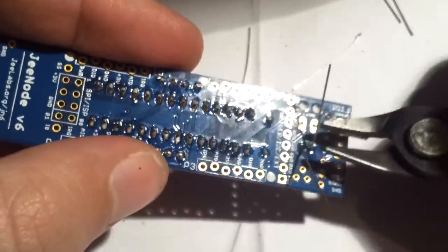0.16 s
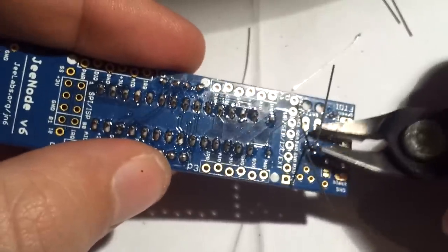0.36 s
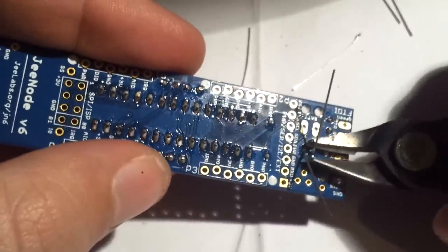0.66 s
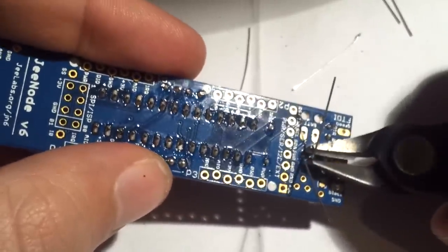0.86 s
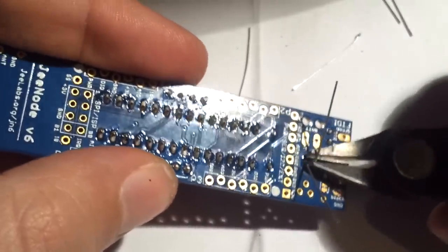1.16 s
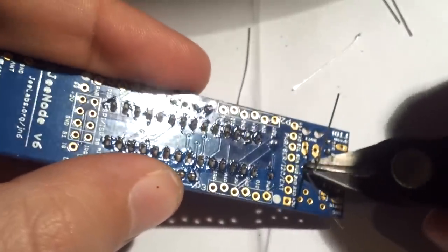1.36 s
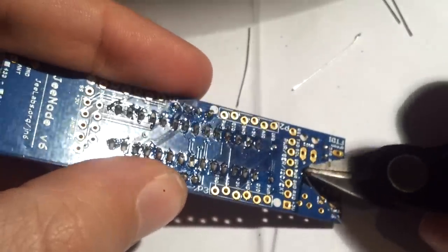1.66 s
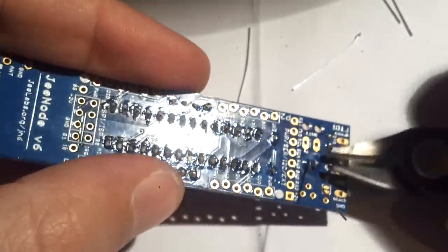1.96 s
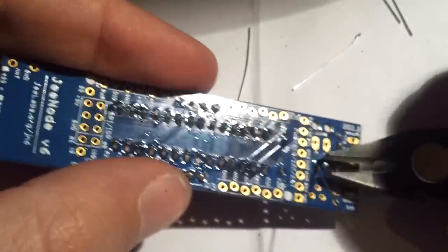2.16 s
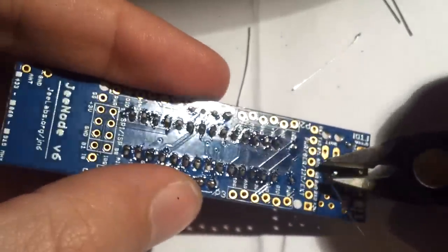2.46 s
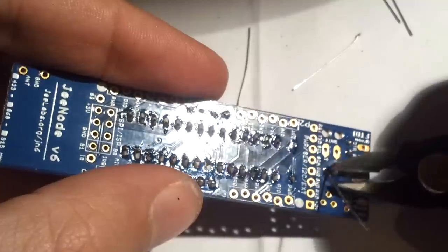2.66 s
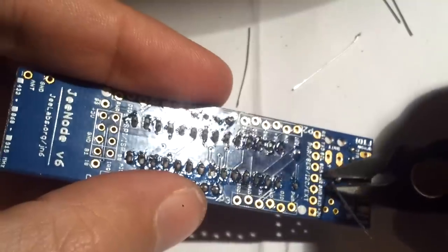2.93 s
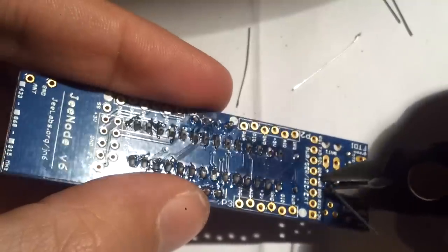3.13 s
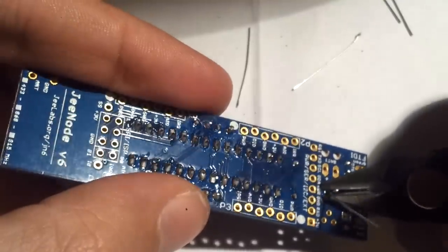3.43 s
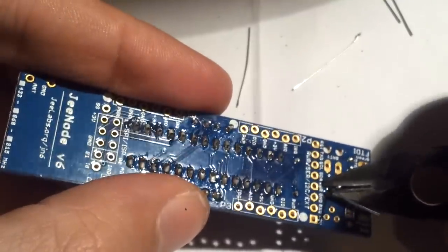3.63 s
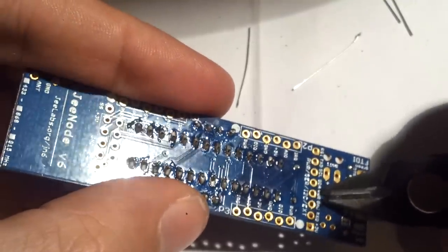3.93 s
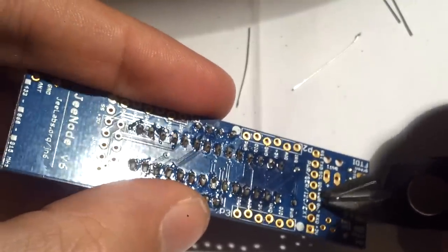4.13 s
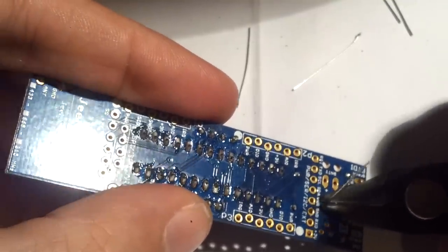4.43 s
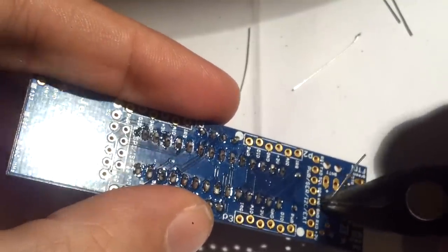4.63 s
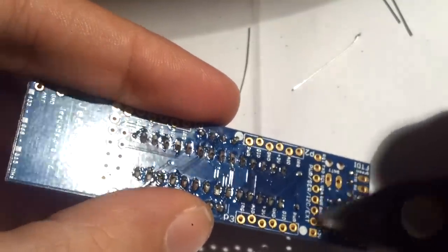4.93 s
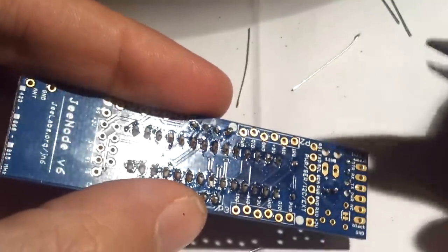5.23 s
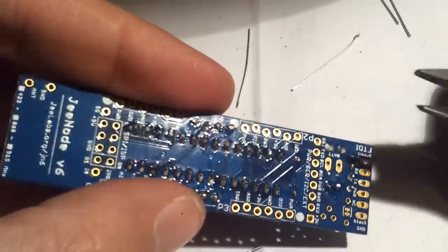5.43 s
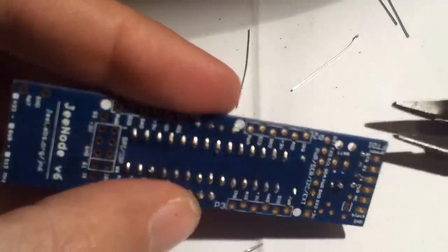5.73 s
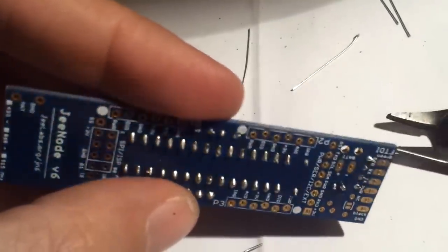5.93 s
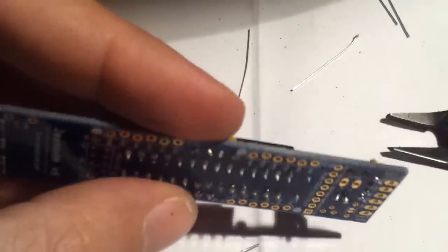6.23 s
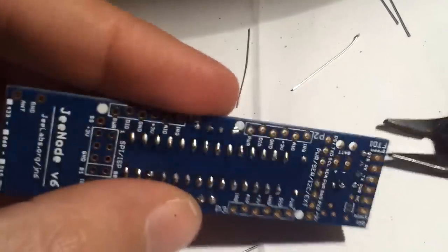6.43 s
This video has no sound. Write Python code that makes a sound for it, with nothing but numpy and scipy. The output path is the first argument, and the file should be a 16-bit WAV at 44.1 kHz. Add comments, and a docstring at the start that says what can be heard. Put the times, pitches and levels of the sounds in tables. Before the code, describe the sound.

Wire cutters snip two leads on a circuit board with sharp, ringing cracks and light ticks, over a steady fan hum.

```python
"""A fan hums throughout a small workshop; a mono microphone is close to a hand-held circuit board.
After a faint tick, wire cutters snip a lead with a crack, steel ring and echo; a wire offcut pings down.
Light ticks of jaws, leads and board follow; a second snip sounds, then more ticks.
Near the end the fingers turn the board with a swelling rub and soft knocks.
Noise bursts make cracks and scrapes, decaying sines ring steel and board, filtered noise and tones hum."""
import sys
import numpy as np
from scipy import signal
from scipy.fft import rfft, irfft, next_fast_len
from scipy.io import wavfile
from scipy.ndimage import uniform_filter1d, minimum_filter1d, map_coordinates

SR = 44100
rng = np.random.default_rng(int(sys.argv[2]) if len(sys.argv) > 2 else 0)


def master_out(mix):
    """Clip the mix to full scale and print it as 16-bit PCM to the path in sys.argv[1]."""
    frames = np.transpose(np.atleast_2d(mix))
    ceiling = np.clip(frames, -1, 1)
    pcm = np.round(ceiling * 32767).astype(np.int16)
    wavfile.write(sys.argv[1], SR, pcm)


N = 290619  # length in samples

# Leads parting near the microphone. Each row: start in seconds, relative level in dB,
# treble tilt in dB per octave, ring time of the jaws in seconds, room level in dB, time between jerks in seconds.
SNIP_EVENTS = [(1.5841, -2, 2, 0.0077, -26, 0.0011), (4.7899, 1, -1, 0.02, -20, .00095)]
# A lead tears in a few jerks, each this much weaker than the one before.
JERK_COUNT, JERK_LOSS_DB = 4, 1.5
# Recoil of the board: level relative to the snip, and a fade on top of the board's own damping.
RECOIL_DB, RECOIL_T60_S = -18.5, .02
# Fracture of the wire. Each row: frequency in Hz, relative level in dB per Hz.
CRACK_SPECTRUM = [(200, -16), (1200, -10.5), (2000, -18), (2900, -9.5), (3900, -11), (5300, -3),
                  (7600, 0.5), (9000, -6), (10200, -5), (11700, -11), (13000, -36)]
# Ringing peaks of the snip; their balance differs between the first and second snip. Each row:
# frequency in Hz, relative level in dB in the first snip, the same in the second, t60 as a share of the ring time.
RING_PEAKS = [(2860, -15, -18, 1.3), (3680, -30, -10.5, 1.3), (4000, -30, -12, 0.88),
              (4865, -5.5, -6.5, 1.2), (5640, -2, -5, .9), (6600, -3, -5, .8), (6900, 3, -5, 1.2),
              (7450, 5.5, 3, 0.63), (8250, 1.5, -2, 1.1), (9160, -12, -6, 0.81), (9500, -7, -12, .9),
              (9800, -1.5, -6, 1.7), (10350, -3, -9, 1.2), (11220, -17, -7, .9)]
# Lingering resonances of the tool. Each row: frequency in Hz, level in dB relative to the room
# in the first snip, the same in the second, t60 in seconds.
TOOL_MODES = [(5070, -18, -7.5, 0.16), (5250, -13, -18, .16), (7190, -5, -13, 0.19), (7740, -5, -25, .28),
              (8480, -15, -19, 0.33), (9100, -24, -19, 0.28), (10950, -9, -18, 0.22)]
# Board held in the hand. Each row: frequency in Hz, relative level in dB, t60 in seconds.
BOARD_MODES = [(238, 3.5, 0.076), (347, 4.5, 0.05), (560, -17, .025), (904, 5, 0.032), (1360, -2, 0.011)]
# Brief rattle from near surfaces. Each row: delay after the snip in seconds, level in dB relative to it.
NEAR_SLAPS = [(.0075, -19), (.0125, -25), (.0185, -29), (.0215, -27)]

# A cut lead lands on the bench. The row: start in seconds, level in dB.
OFFCUT_LANDING = (1.6932, -27.5)
# Thin wire of the offcut. Each row: frequency in Hz, relative level in dB, t60 in seconds.
WIRE_MODES = [(7770, -3, 0.1), (8236, -4, .06), (8947, -6, 0.065), (10600, -15, 0.07)]

# Light contacts of jaws, leads and board. Each row: start in seconds, relative level in dB, centre in Hz,
# spread in octaves, ring time in seconds.
TICK_EVENTS = [(0.396, -41, 9100, .15, 0.015), (1.8496, -25, 8700, 0.57, 0.017),
               (1.8665, -37, 9200, .6, .018), (1.9595, -22, 8900, 0.72, 0.013),
               (1.9703, -39, 9500, .6, .015), (1.9945, -34, 8200, 0.65, .015),
               (5.5347, -23.5, 8700, 0.37, 0.011), (5.6606, -34.5, 7200, 0.97, 0.091),
               (5.9055, -38, 9400, .25, .015), (5.9923, -18, 6400, 0.65, 0.017),
               (6.0035, -32, 6300, .45, .025), (6.0197, -32, 7000, 0.68, .016)]

# Soft knocks of the board in the fingers. Each row: start in seconds, relative level in dB.
KNOCK_EVENTS = [(6.392, -35), (6.4848, -21), (6.512, -32)]
# Dull scuff of the fingers in each knock. Each row: frequency in Hz, relative level in dB per Hz.
SKIN_SPECTRUM = [(60, -23), (200, -3), (600, -11), (900, -15), (1500, -11), (2200, -30), (7000, -34),
                 (10000, -36), (11500, -68)]
# Fingers slide on the board: the rub starts faintly and swells as the turn gathers speed.
TURN_START_S, TURN_START_DB, TURN_SWELL_DB_PER_S = 6, -57, 31

# Diffuse answer of bench and walls to a snip. Each row: frequency in Hz, relative level in dB per Hz.
ECHO_SPECTRUM = [(300, -11), (2000, -0.5), (2900, -5), (3800, -0.5), (5000, -5), (6200, 4), (7500, 3.5),
                 (9000, 3.5), (10200, 2.5), (11700, -6), (13000, -33)]
ROOM_T60_S = 0.32
CLUMPS_PER_S, CLUMP_DB = 330, 2.2  # unevenness of the echo
# A mild extra treble fade softens the top of the echo: its corner frequency and t60.
TREBLE_HZ, TREBLE_T60_S = 9300, 1

# Broad rush of the fan. Each row: frequency in Hz, relative level in dB per Hz.
AIR_SPECTRUM = [(20, -29), (50, -18), (90, -9), (130, -3.5), (240, 0.5), (350, -2), (600, -8), (1500, -6.5),
                (2100, -11.5), (3800, -17.5), (5200, -16), (8000, -23.5), (9600, -34.5), (11000, -67)]
# Peaks and notches of fan housing and bench reflection. Each row: frequency in Hz, width in Hz, change in dB.
HOUSING_PEAKS = [(409, 17, -6), (501, 55, 6.5), (670, 37, -3.5), (743, 94, 6), (954, 46, -6.5),
                 (1120, 29, 4), (2060, 138, -4), (2800, 340, 4.5), (6100, 280, -2)]
ROTOR_HZ = 43.35  # mean shaft rate
# Tones of the five-bladed rotor. Each row: multiple of the shaft rate, level in dB rms before flutter.
ROTOR_TONES = [(1, -62.5), (4, -62), (5, -39), (10, -41), (17, -40.5), (20, -52.5), (25, -54), (30, -58)]
# Motor hum. Each row: frequency in Hz, level in dB rms before flutter.
MAINS_TONES = [(100, -59.5), (300, -41)]

TOP_HZ = 11950  # upper band edge at the microphone output


def amp(db):
    """Decibels to gain."""
    return 10 ** (np.asarray(db) / 20)


def unit(x):
    """Scale to rms 1."""
    return x / np.sqrt(np.mean(x ** 2) + 1e-20)


def along(points, hz):
    """Read (Hz, value) points on a log frequency axis."""
    f, v = np.transpose(points)
    return np.interp(np.log(hz + 1), np.log(f + 1), v)


def wobble(rate):
    """A smooth random curve, rate knots a second."""
    knots = rng.standard_normal(int(N * rate / SR) + 4)
    return map_coordinates(knots, [np.arange(N) * rate / SR])


def filtered(x, response):
    """Multiply the spectrum of x by a response of frequency."""
    m = next_fast_len(len(x) + SR // 4)
    hz = np.fft.rfftfreq(m, 1 / SR)
    return irfft(rfft(x, m) * response(hz), m)[:len(x)]


def noise(size, colour):
    """Noise of rms 1 whose spectrum follows colour(Hz) in dB."""
    return unit(filtered(rng.standard_normal(size), lambda hz: amp(colour(hz))))


def fade(t, t60):
    """Exponential decay, down 60 dB after t60 seconds."""
    return np.exp(-np.log(1000) * t / t60)


def add(track, s, sound):
    """Mix a sound into the track at time s."""
    part = track[round(s * SR):][:len(sound)]
    part += sound[:len(part)]


def snips(crack_db=-1, crack_t60=0.01, jaws_db=1.0, echo_tilt=0.66, puff_db=-36, puff_t60=0.41):
    """The wire tears in quick jerks; each cracks and renews the jaws' ring. Board recoils, room answers."""
    out, t = np.zeros(N), np.arange(SR // 2) / SR
    _, *jaw_levels, life = np.transpose(RING_PEAKS)
    _, *ring_levels, _ = np.transpose(TOOL_MODES)
    for event, jaw_db, ring_db in zip(SNIP_EVENTS, jaw_levels, ring_levels):
        s, db, tilt_db, ring_t60, room_db, jerk_s = event
        tilt = lambda hz: tilt_db * np.log2(hz + 1)
        jerk = np.minimum(t // jerk_s, JERK_COUNT - 1)
        age = t - jerk * jerk_s  # time since the latest jerk
        crack = noise(len(t), lambda hz: along(CRACK_SPECTRUM, hz) + tilt(hz)) * fade(age, crack_t60)
        jaws = (steel(t, jaw_db) * fade(age, ring_t60 * life[:, None])).sum(axis=0)
        snap = amp(db - jerk * JERK_LOSS_DB) * (amp(crack_db) * crack + amp(jaws_db) * jaws)
        add(out, s, snap)
        for delay_s, slap_db in NEAR_SLAPS:
            add(out, s + delay_s, amp(slap_db) * snap)
        add(out, s, amp(db + RECOIL_DB) * board(t) * fade(t, RECOIL_T60_S))
        echo = noise(len(t), lambda hz: along(ECHO_SPECTRUM, hz) + echo_tilt * tilt(hz))
        add(out, s, amp(room_db) * (reflections(echo, t) + after_ring(t, ring_db)))
        # the jolt of the hands leaves a puff of deep rumble below the hum
        puff = noise(len(t), lambda hz: along([(12, -1), (35, -9), (120, -26), (400, -80)], hz))
        add(out, s, amp(puff_db) * puff * fade(t, puff_t60))
    return out


def steel(t, db):
    """Undamped ringing peaks, one row each: levels a little different, phases fully random each time."""
    hz = np.array(RING_PEAKS)[:, 0]
    gain = amp(db + rng.normal(0, 1, len(hz)))
    gain = gain / np.linalg.norm(gain)
    cycles = hz[:, None] * t + rng.random((len(hz), 1))
    return gain[:, None] * np.sin(2 * np.pi * cycles)


def after_ring(t, levels_db, width_hz=45):
    """The tool's lasting resonances as narrow noise bands: blurred by the room, each one flutters."""
    out = np.zeros(len(t))
    for (hz, *_, t60), db in zip(TOOL_MODES, levels_db):
        band = noise(len(t), lambda f: -20 * np.log10(1 + ((f - hz) / width_hz) ** 2))
        out += amp(db) * band * fade(t, t60)
    return out


def board(t, attack_s=0.0014):
    """The board's low modes, damped by the fingers, with a soft onset."""
    ring = sum(amp(db) * np.sin(2 * np.pi * hz * t) * fade(t, t60) for hz, db, t60 in BOARD_MODES)
    return ring * (1 - np.exp(-t / attack_s))


def offcut(click_db=-6, click_t60=0.058):
    """A loose piece of wire clicks and rings in its own modes as it lands."""
    out, t = np.zeros(N), np.arange(SR // 3) / SR
    s, level_db = OFFCUT_LANDING
    ping = sum(amp(db) * np.sin(2 * np.pi * hz * t) * fade(t, t60) for hz, db, t60 in WIRE_MODES)
    click = noise(len(t), lambda hz: along(CRACK_SPECTRUM, hz)) * fade(t, click_t60)
    add(out, s, amp(level_db) * (ping + amp(click_db) * click))
    return out


def ticks(scrape_db=0, wet_db=-9.0, linger_db=-13):
    """A light touch is a short scrape that favours part of the steel's range and leaves a faint ring."""
    out, t = np.zeros(N), np.arange(SR // 3) / SR
    jaw_hz, *jaw_levels, life = np.transpose(RING_PEAKS)
    ring_hz, *ring_levels, _ = np.transpose(TOOL_MODES)
    for s, db, centre_hz, octaves, t60 in TICK_EVENTS:
        colour = lambda hz: -6 * (np.log2((hz + 1) / centre_hz) / octaves) ** 2
        scrape = amp(scrape_db) * noise(len(t), colour) * fade(t, t60)
        modes = steel(t, np.mean(jaw_levels, axis=0) + colour(jaw_hz))
        jaws = (modes * fade(t, t60 * life[:, None])).sum(axis=0)
        tick = amp(db) * (scrape + jaws)
        linger = amp(db + linger_db) * after_ring(t, np.mean(ring_levels, axis=0) + colour(ring_hz))
        add(out, s, tick + linger + amp(wet_db) * room(tick))
    return out


def handling(rub_db=-1, rub_t60=0.033, wet_db=-8):
    """Friction noise excites the board as the fingers turn it; bumps ring it with a skin scuff."""
    t = np.arange(SR // 3) / SR
    board_response = board(t) * fade(t, rub_t60)
    friction = unit(signal.fftconvolve(rng.standard_normal(N), board_response, "same"))
    turning = np.arange(N) / SR - TURN_START_S
    out = friction * amp(TURN_START_DB + TURN_SWELL_DB_PER_S * turning) * (turning > 0)
    for s, db in KNOCK_EVENTS:
        scuff = amp(rub_db) * noise(len(t), lambda hz: along(SKIN_SPECTRUM, hz)) * fade(t, rub_t60)
        knock = amp(db) * (board(t) + scuff)
        add(out, s, knock + amp(wet_db) * room(knock))
    return out


def reflections(x, t, rise_s=0.00089):
    """Shape noise into the room's answer: it dies away in uneven clumps, its top mildly softened."""
    treble = filtered(x, lambda hz: 1 - 1 / (1 + (hz / TREBLE_HZ) ** 20))
    treble_loss = treble * (1 - fade(t, TREBLE_T60_S))
    clumps = unit(amp(CLUMP_DB * wobble(CLUMPS_PER_S)[:len(t)]))
    return (x - treble_loss) * clumps * fade(t, ROOM_T60_S) * (1 - np.exp(-t / rise_s))


def room(x):
    """Convolve a close sound with a fresh diffuse tail from bench and walls."""
    t = np.arange(SR // 2) / SR
    tail = reflections(rng.standard_normal(len(t)), t)
    return signal.fftconvolve(x, tail / np.linalg.norm(tail))[:len(x)]


def fan(air_db=-30, drift=0.00092, flutter_db=0.5):
    """Air rushes through the housing under slightly unsteady blade tones and mains hum."""
    t = np.arange(N) / SR

    def colour(f):
        """Air spectrum in dB with the housing's peaks and notches."""
        peaks = sum(db * np.exp(-.5 * ((f - hz) / width) ** 2) for hz, width, db in HOUSING_PEAKS)
        return along(AIR_SPECTRUM, f) + peaks

    def tone(cycles, db):
        """A sine of random phase whose level flutters."""
        return amp(db + flutter_db * wobble(6.6)) * unit(np.sin(2 * np.pi * (cycles + rng.random())))

    air = amp(air_db) * noise(N, colour)
    turns = np.cumsum(ROTOR_HZ * (1 + drift * wobble(4.95))) / SR  # shaft speed drifts slightly
    blades = sum(tone(order * turns, db) for order, db in ROTOR_TONES)
    hum = sum(tone(hz * t, db) for hz, db in MAINS_TONES)
    return air + blades + hum


def scene():
    """One microphone feeds both channels."""
    mono = snips() + offcut() + ticks() + handling() + fan()
    return np.tile(mono, (2, 1))


def record(dry):
    """A fast limiter holds peaks about full scale; then a steep low-pass ends the band."""
    needed = 1 / np.maximum(np.abs(dry), 1)
    gain = uniform_filter1d(minimum_filter1d(needed, size=15), size=15)  # windows in samples
    low_pass = signal.ellip(12, .1, 70, TOP_HZ, fs=SR, output="sos")
    return signal.sosfilt(low_pass, dry * gain)


dry = scene()
out = record(dry)
master_out(out)
```